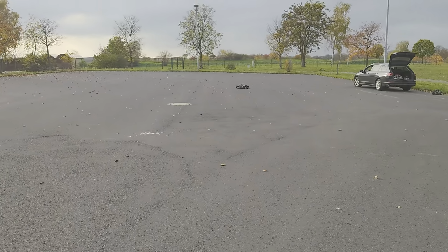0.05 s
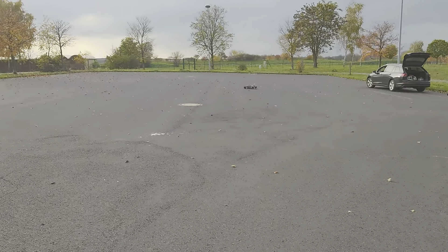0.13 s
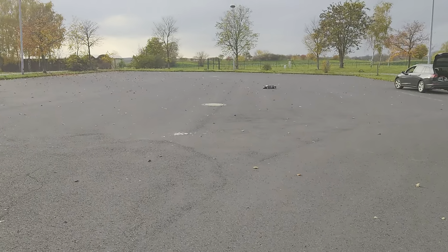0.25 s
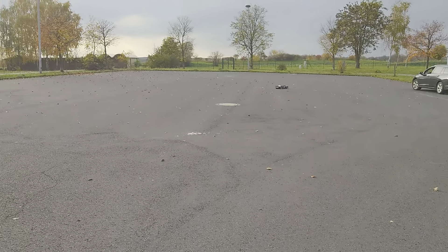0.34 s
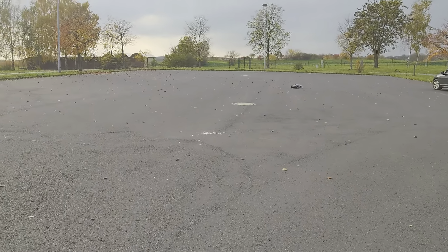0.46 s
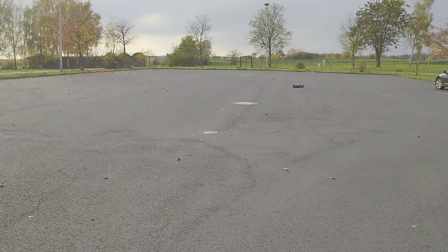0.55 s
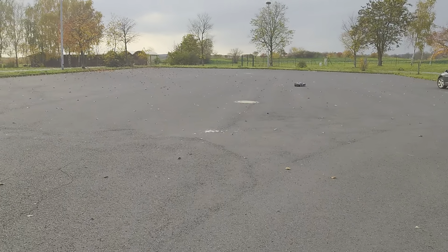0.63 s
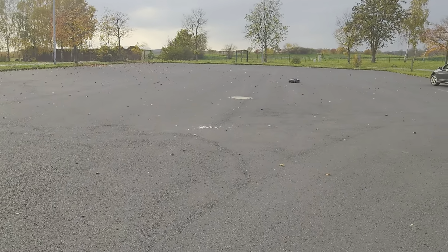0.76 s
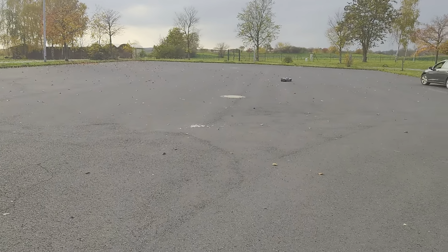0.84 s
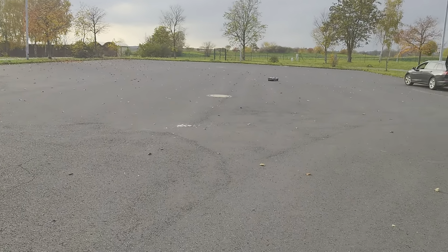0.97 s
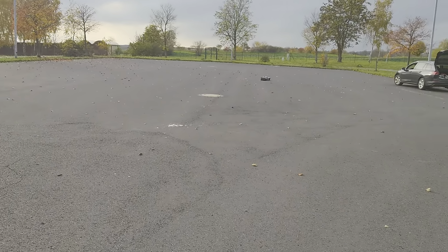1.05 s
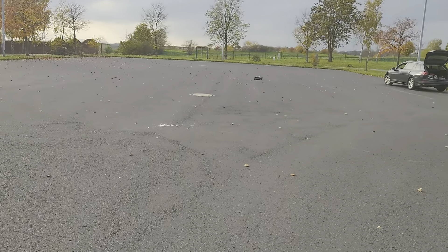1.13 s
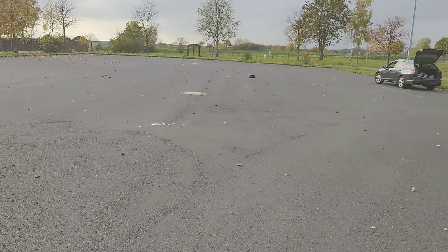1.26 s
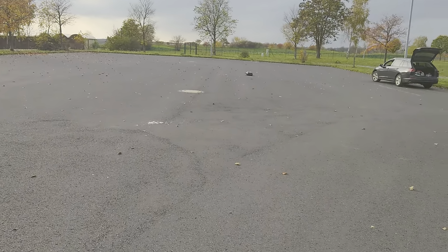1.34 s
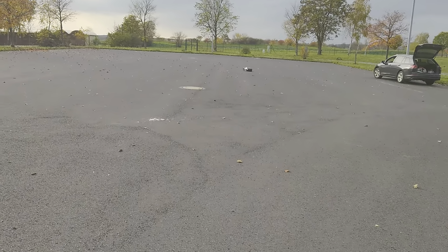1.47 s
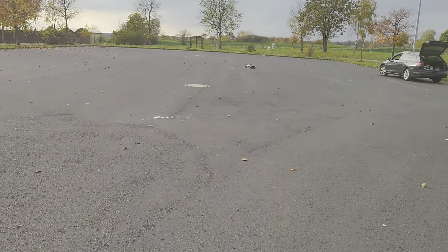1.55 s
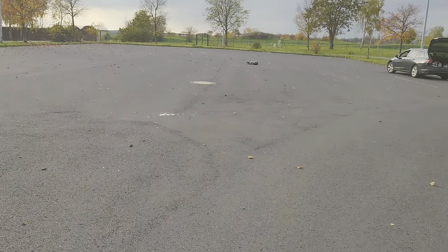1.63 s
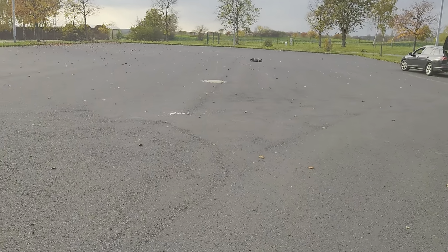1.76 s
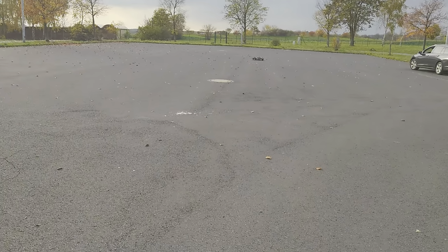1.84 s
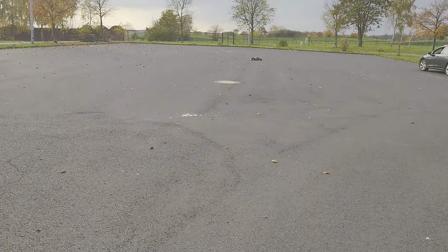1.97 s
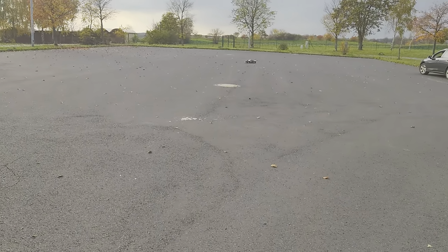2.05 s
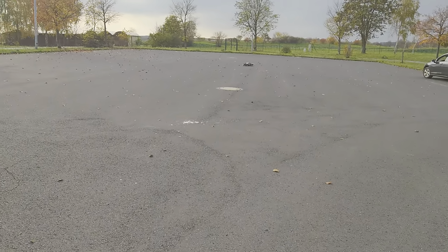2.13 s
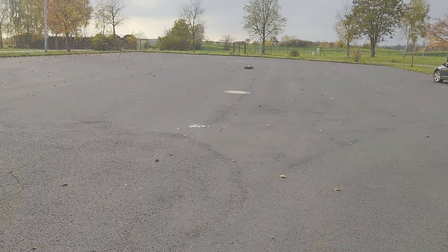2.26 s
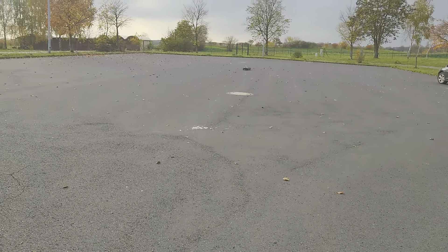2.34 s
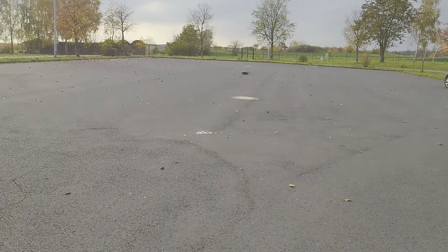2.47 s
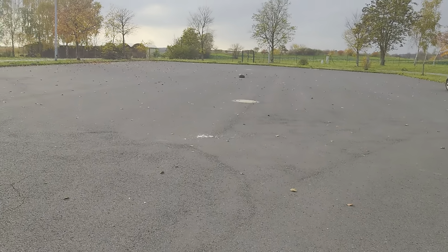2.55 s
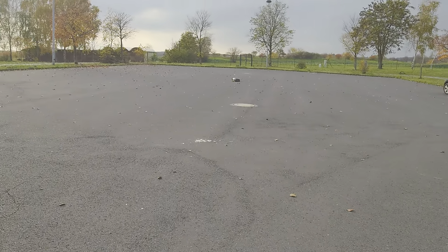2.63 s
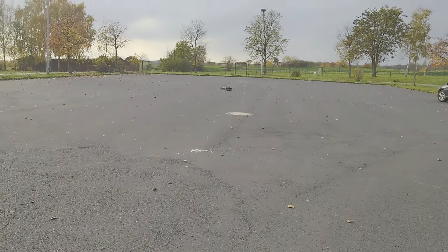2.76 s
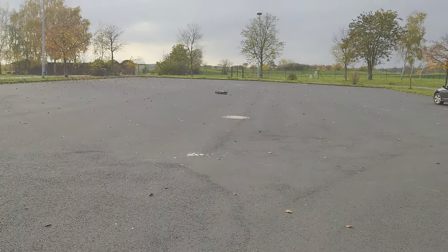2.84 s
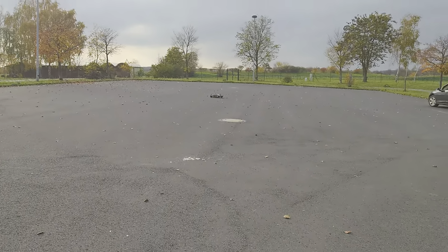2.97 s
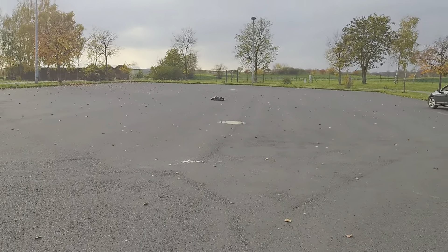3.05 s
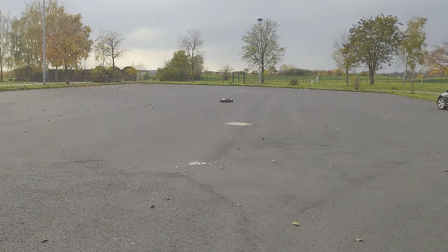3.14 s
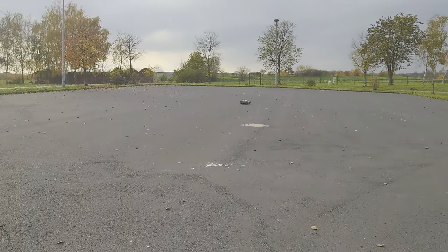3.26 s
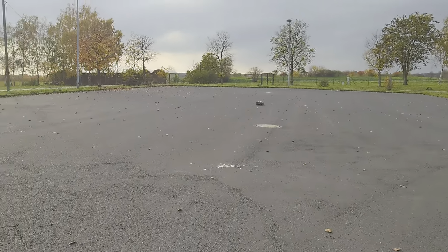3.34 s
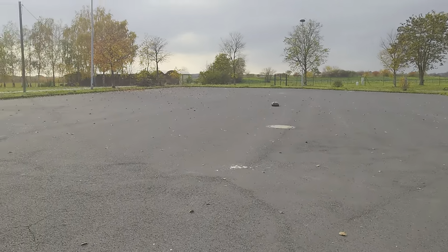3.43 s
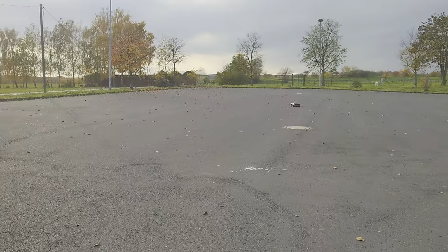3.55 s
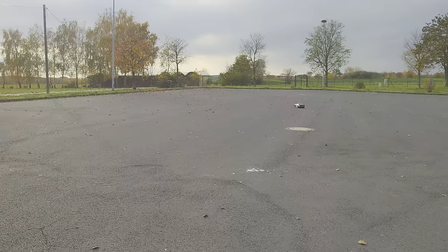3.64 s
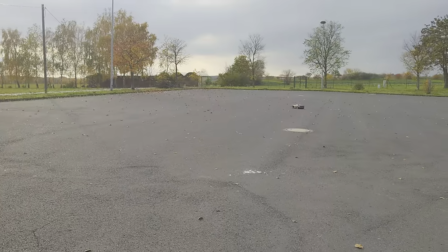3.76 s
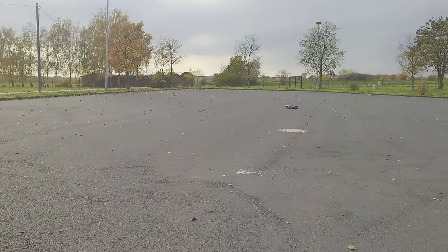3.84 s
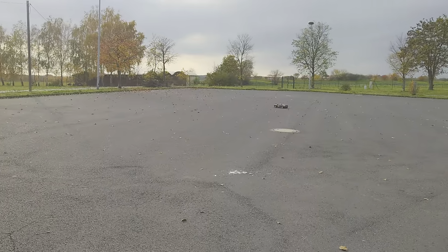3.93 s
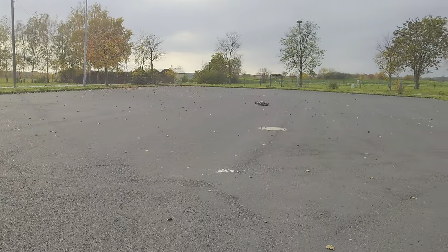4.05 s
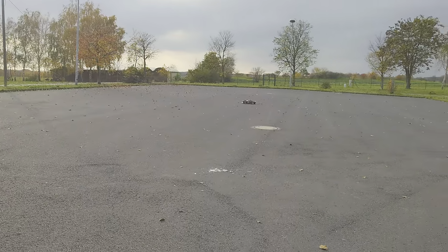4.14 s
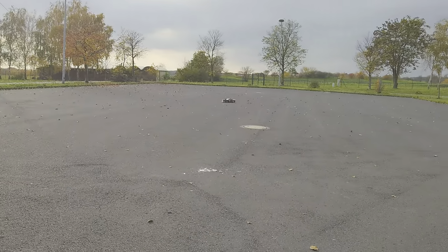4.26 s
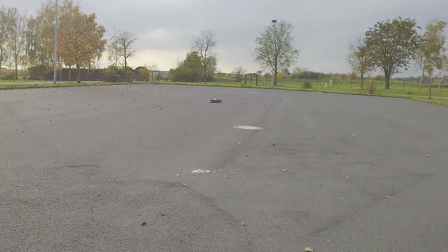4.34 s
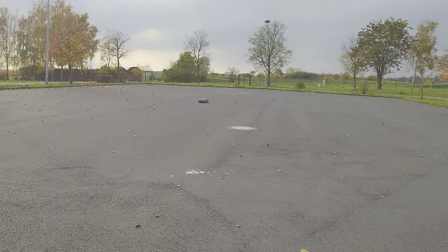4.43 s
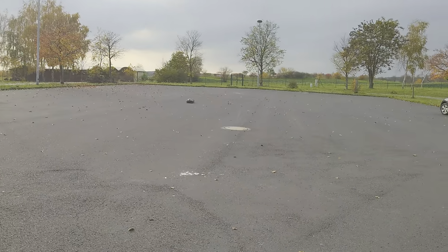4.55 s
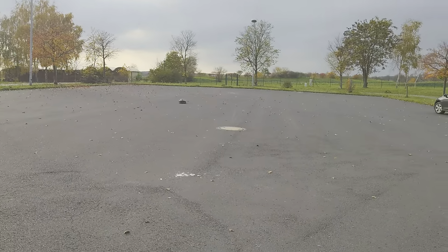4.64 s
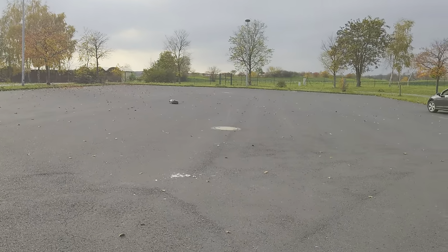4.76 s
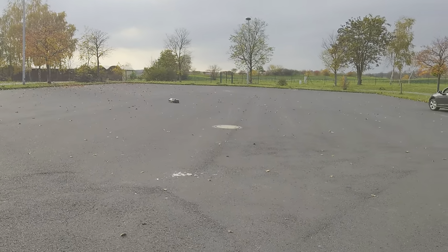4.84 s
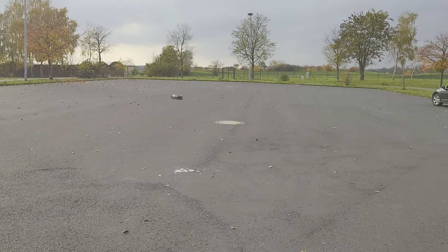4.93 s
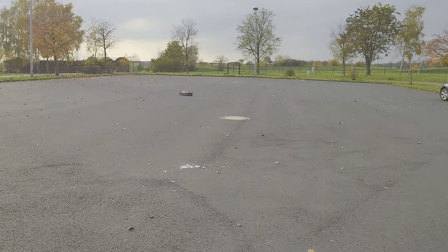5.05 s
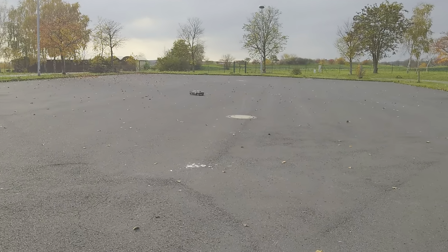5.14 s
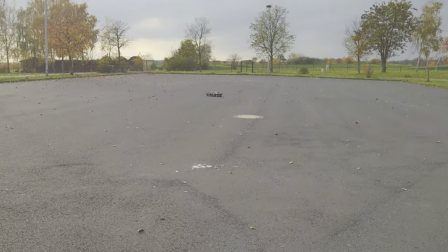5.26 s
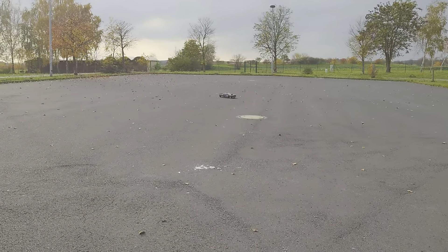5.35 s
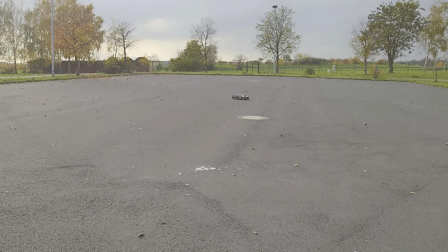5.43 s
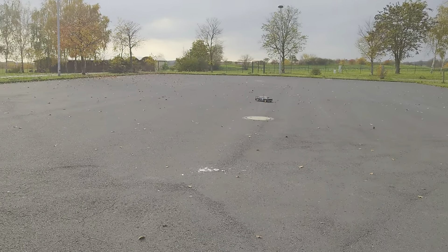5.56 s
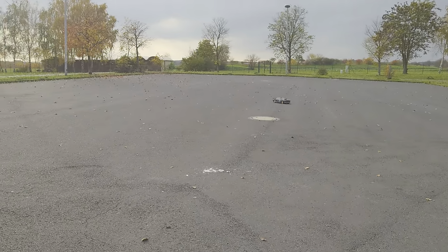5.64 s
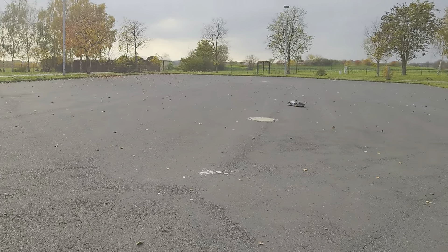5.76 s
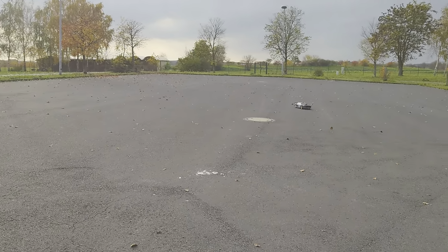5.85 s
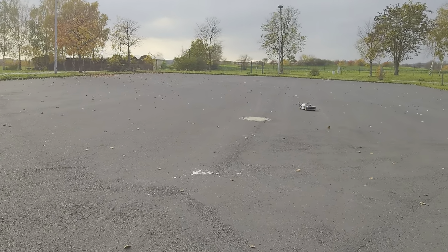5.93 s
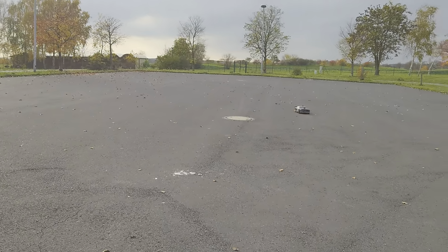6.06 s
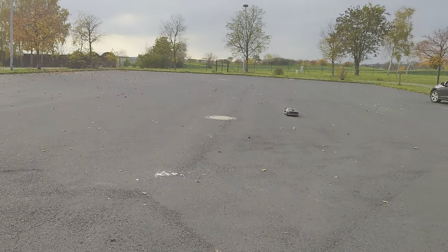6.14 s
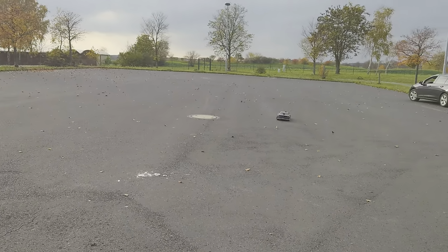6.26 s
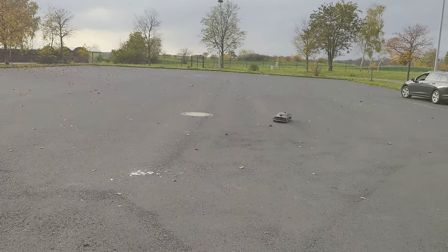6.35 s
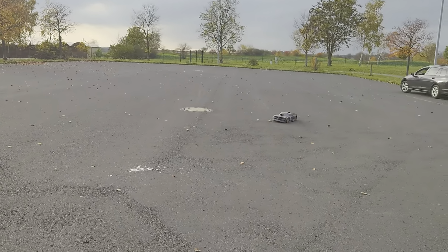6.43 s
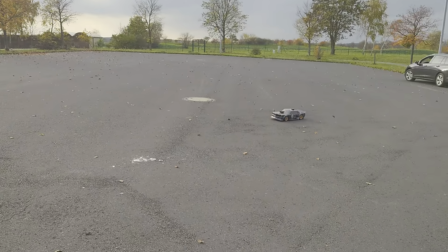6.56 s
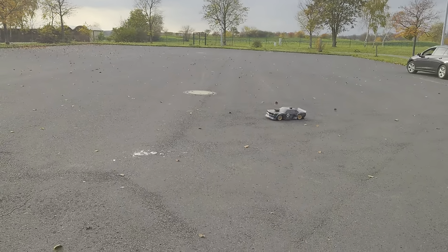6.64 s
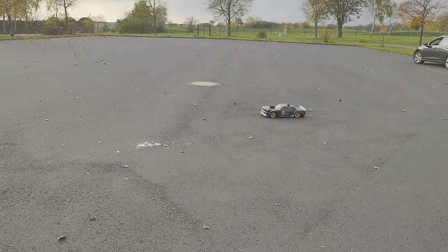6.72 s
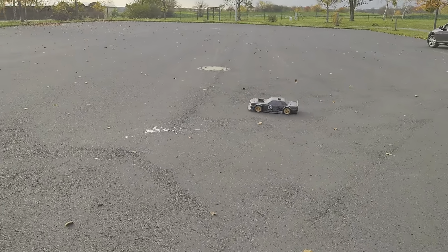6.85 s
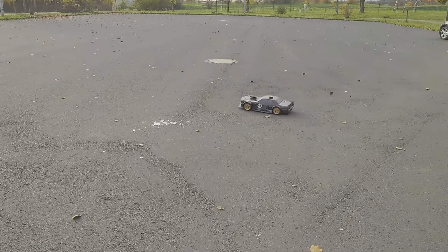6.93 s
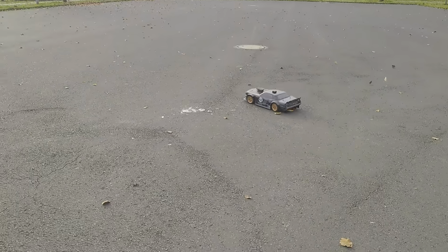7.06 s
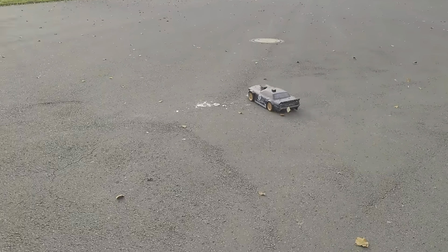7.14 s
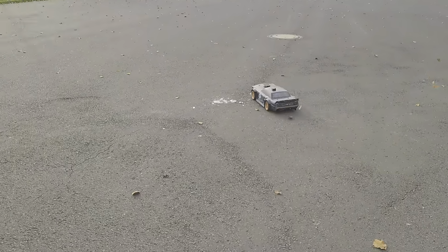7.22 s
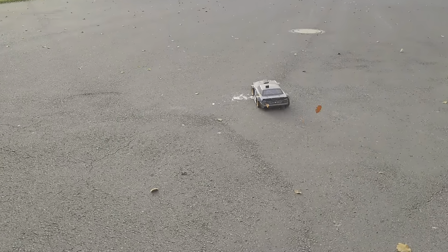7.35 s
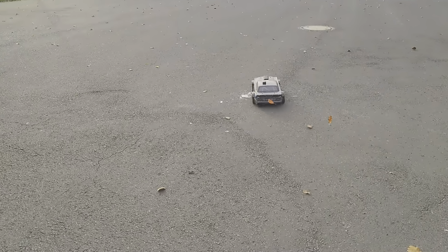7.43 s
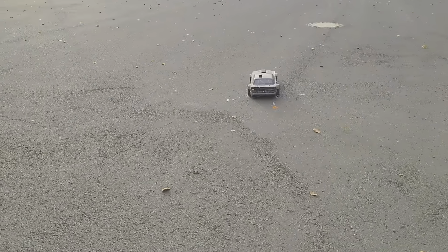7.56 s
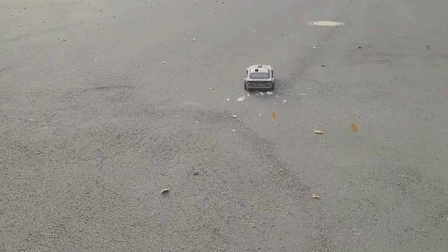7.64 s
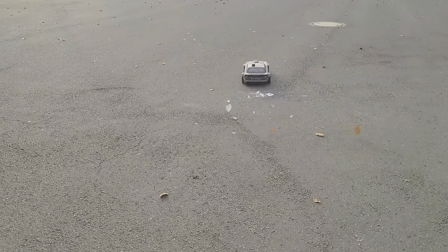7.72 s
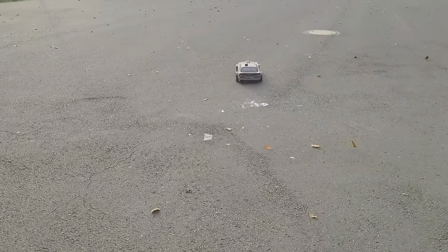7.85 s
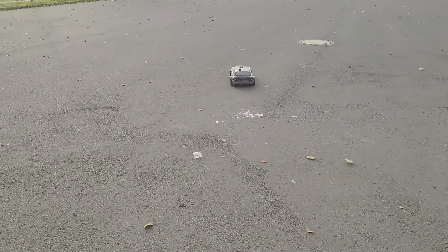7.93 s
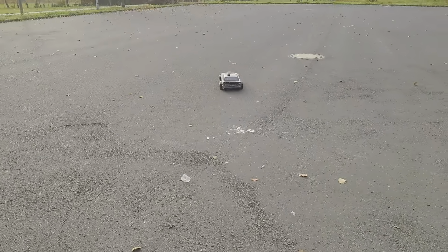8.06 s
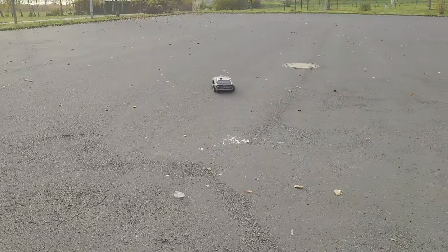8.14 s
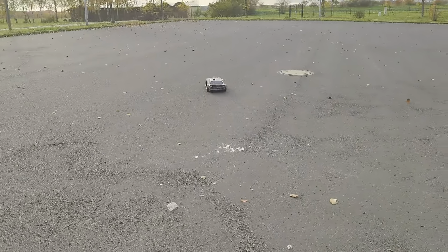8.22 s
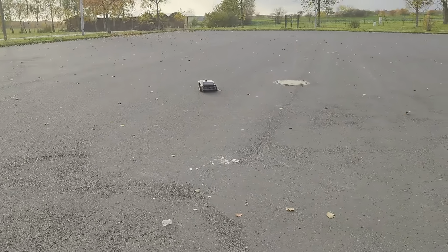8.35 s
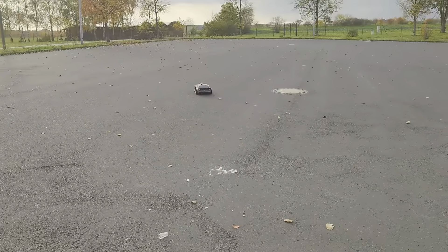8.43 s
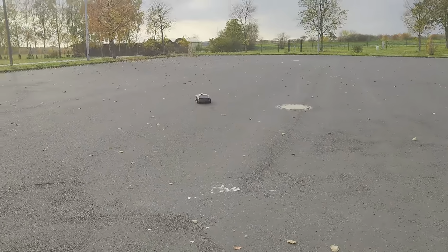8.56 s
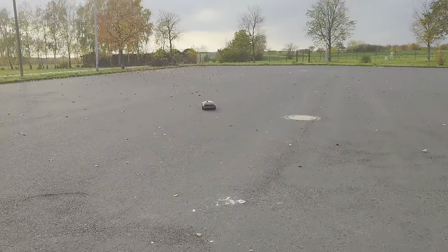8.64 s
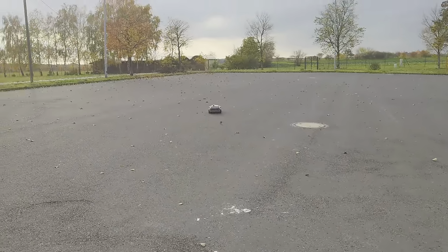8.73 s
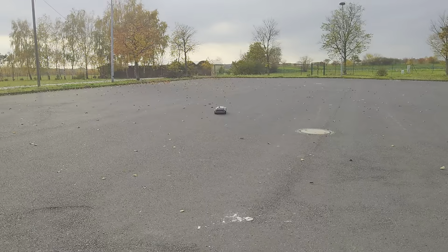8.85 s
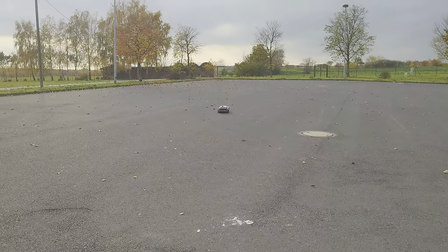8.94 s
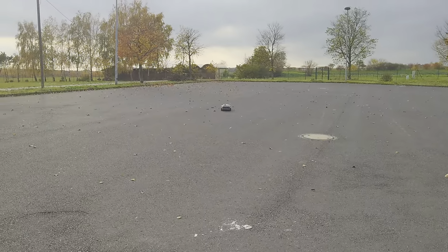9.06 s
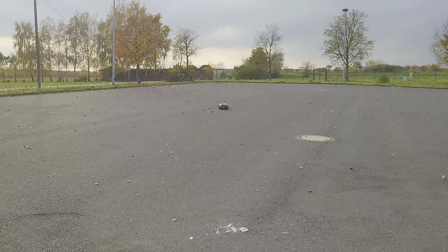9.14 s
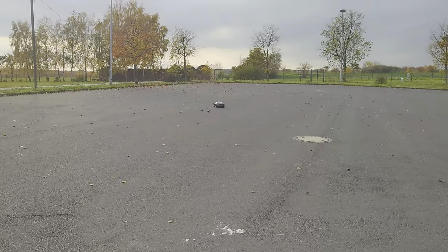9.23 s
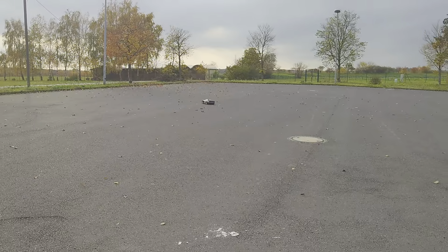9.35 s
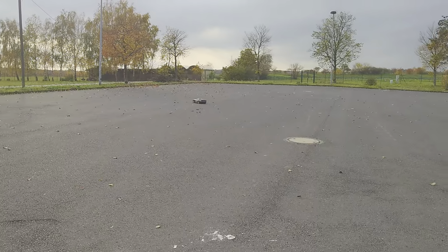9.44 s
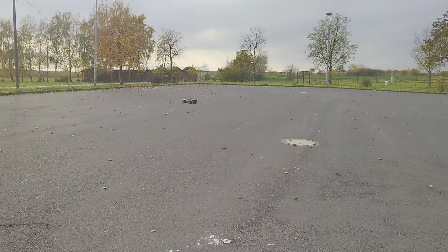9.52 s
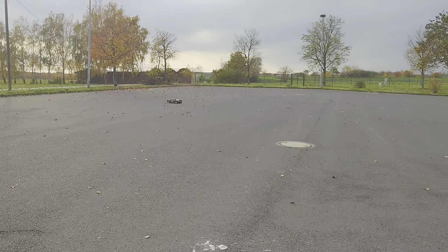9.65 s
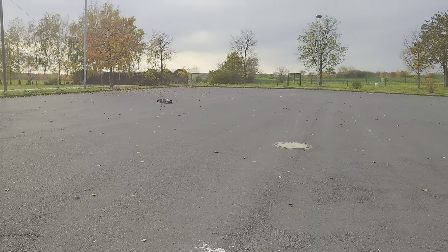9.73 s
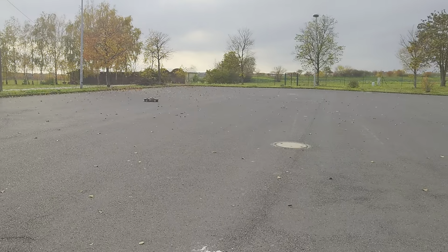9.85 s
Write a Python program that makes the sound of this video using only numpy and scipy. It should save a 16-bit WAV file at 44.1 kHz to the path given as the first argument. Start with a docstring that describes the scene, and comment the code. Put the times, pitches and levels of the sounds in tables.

```python
"""Small electric model car on open asphalt

It darts about, comes close, skids round and drives off. Gear teeth whine as shaken tones that climb with
each burst of throttle; filtered noise makes the drive train's rasp, the tyre roar and the fizz of grit.
Short noise hits are ticks and chassis knocks, sinking tones are brief low whirrs, and shaped noise is
the air, the breeze and soft bumps at the two microphones."""
import sys
import numpy as np
from scipy import signal
from scipy.fft import rfft, irfft
from scipy.io import wavfile
from scipy.ndimage import map_coordinates

SR = 44100
rng = np.random.default_rng(int(sys.argv[2]) if len(sys.argv) > 2 else 0)


def bounce(signal):
    """Save signal as a 16-bit WAV file at the path given by the first command-line argument."""
    frames = np.transpose(np.atleast_2d(signal))
    limited = np.clip(frames, -1, 1)
    pcm = np.round(limited * 32767).astype(np.int16)
    wavfile.write(sys.argv[1], SR, pcm)


N = 436149
TIME, BINS = np.arange(N) / SR, np.fft.rfftfreq(N, 1 / SR)
SIDES = np.array([[.5], [-.5]])  # shares a left-minus-right difference between the two channels


def amp(db):
    """Decibels to gain."""
    return 10 ** (np.asarray(db) / 20)


def evened(x):
    """Scales to rms 1."""
    return x / np.sqrt(np.mean(x ** 2) + 1e-20)


def filtered(x, gain):
    """Multiplies the spectrum by a gain along frequency."""
    return irfft(rfft(x) * gain, N)


def read(points, hz=BINS):
    """Reads a spectrum table on a log-frequency axis."""
    f, value = np.transpose(points)
    return np.interp(np.log(hz + 1), np.log(np.abs(f) + 1), value)


def curves(rows, t=TIME):
    """The columns of a table as functions of time."""
    s, *columns = np.transpose(rows)
    return [np.interp(t, s, c) for c in columns]


def add(mix, s, sound):
    """Mixes a sound in at a time in seconds."""
    part = mix[..., max(round(s * SR), 0):][..., :sound.shape[-1]]
    part += sound[..., :part.shape[-1]]


def wander(rate_hz):
    """Smooth random motion of rms 1, mostly slower than a rate."""
    return evened(filtered(rng.standard_normal(N), 1 / (1 + (BINS / rate_hz) ** 4)))


# Stereo likeness of the noises. Each row: frequency in Hz, left-right correlation from -1 to 1.
LIKENESS = [(40, -0.5), (130, 0.8), (600, 0.95), (2000, 0.94), (5000, 0.98), (9000, 0.67), (15000, 0.064)]


def pair(colour_db, drive=1):
    """Coloured noise at two microphones, alike in the midrange and unrelated at the very top."""
    a, b = rfft(rng.standard_normal((2, N)) * drive)
    same = np.clip(read(LIKENESS), -1, 1)
    other = same * a + np.sqrt(1 - same ** 2) * b
    x = irfft(np.array([a, other]) * amp(colour_db), N)
    return x / np.std(x.mean(0))


def scatter(x, t60, wet_db):
    """Adds a dying cloud of reflections, different at each microphone."""
    t = TIME[:SR // 2]
    taps = rng.standard_normal((2, len(t))) * amp(-60 * t / t60) * (t > .0005)
    taps /= np.linalg.norm(taps, axis=1, keepdims=True)
    wet = signal.fftconvolve(np.atleast_2d(x), taps, axes=1)[:, :N]
    return (x + amp(wet_db) * wet) / np.hypot(1, amp(wet_db))


def ripple(depth_db, width_hz):
    """Many small fixed resonances of the chassis, as a gain along frequency."""
    knots = rng.standard_normal(1000)
    return amp(depth_db * np.interp(BINS / width_hz, np.arange(len(knots)), knots))


def pressed(on, off, attack_s, release_s):
    """The load of one burst or slide, 0-1: it builds exponentially and lets go along a bell curve."""
    build = 1 - np.exp(-np.clip(TIME - on, 0, off - on) / attack_s)
    return build * np.exp(-(np.maximum(TIME - off, 0) / release_s) ** 2)


def blows(rows, low_hz, high_hz, t60, ring_db=-100):
    """Short hits: a dying burst of noise in a band, with a brief ring where the row gives one."""
    out, t = np.zeros((2, N)), TIME[:SR // 4]
    band = signal.butter(2, [low_hz, min(high_hz, SR / 2 - 1)], "bandpass", fs=SR, output="sos")
    for s, db, *ring in rows:
        noise = rng.standard_normal(len(t)) + .5 * rng.standard_normal((2, len(t)))
        hit = evened(signal.sosfilt(band, noise * amp(-60 * t / t60)))
        for hz in ring:
            tone = np.sin(2 * np.pi * hz * t) * amp(-60 * t / 0.02)
            hit = hit + amp(ring_db) * evened(tone)
        add(out, s, amp(db) * hit / abs(hit.mean(0)).max())
    return out


# Colour of the open air. Each row: frequency in Hz, density in dB per Hz.
AIR_COLOUR = [(20, 16), (68, 22.5), (198, -36), (319, 5), (459, 15), (897, 15.5), (1330, 11), (1610, -23),
              (3340, -26), (5080, -7), (10500, -60), (12800, -36)]
AIR_DB = -63


def open_air():
    """Steady air: noise shaped by a fixed spectrum."""
    return amp(AIR_DB) * pair(read(AIR_COLOUR))


def breeze():
    """A little wind at the microphones: low noise whose level wanders slowly."""
    colour = [(15, 0), (50, -2), (95, -4), (140, -14), (400, -40), (2000, -80)]  # Hz, dB
    gusts = evened(amp(3 * wander(6)))
    return amp(-68.5) * pair(read(colour)) * gusts


# Soft low bumps at the microphones. Each row: start in seconds, peak in dB before a 6.5 dB cut.
SOFT_BUMPS = [(2.467, -41), (3.548, -44), (4.951, -40), (5.932, -34), (6.901, -45)]


def bumps():
    """Soft thuds at the microphones: deep, quickly dying noise."""
    return amp(-6.5) * blows(SOFT_BUMPS, 20, 130, t60=0.18)


# Grit ticking on the car. Each row: start in seconds, peak in dB before filtering, ring in Hz.
GRIT_TICKS = [(0.1361, -33, 5300), (0.4495, -32, 5300), (0.483, -33, 2020), (0.5462, -33, 2300),
              (0.724, -36.5, 5130), (0.8506, -29, 2270), (0.8763, -32, 5200), (2.145, -31, 2600),
              (2.4914, -36, 2370), (5.9354, -24, 3740), (7.277, -17, 1430)]


def ticks():
    """Grit strikes the shell: bright clicks with a short ring, dulled around 9.5 kHz."""
    dip_db = -12 / (1 + ((BINS - 9500) / 2000) ** 4)
    return filtered(blows(GRIT_TICKS, 2200, 14000, t60=.022, ring_db=2), amp(dip_db))


# The chassis knocking over bumps. Each row: start in seconds, peak in dB at the car.
CHASSIS_KNOCKS = [(0.189, -24), (0.752, -41), (0.991, -36), (1.042, -32.5), (5.965, -19), (5.973, -13.5),
                  (6.011, -14), (7.012, -15), (7.21, -10)]


def knocks():
    """The chassis knocks: short midrange bursts of noise."""
    return blows(CHASSIS_KNOCKS, 700, 2300, t60=.035)


# Brief low whirrs. Each row: start in seconds, length in seconds, middle pitch in Hz, level in dB.
LOW_WHIRRS = [(0.194, 0.11, 1510, -45), (3.021, 0.15, 1460, -31), (4.352, 0.032, 1356, -34),
              (6.464, 0.1, 1390, -31)]


def whirrs(fall=0.085, rough=0.018, flutter_db=3.5):
    """Brief low whirrs: rough, sinking tones from tyres or the slowing motor."""
    out, pitch_shake = np.zeros(N), wander(126)
    flutter = evened(amp(flutter_db * wander(66)))
    for s, length, hz, db in LOW_WHIRRS:
        u = np.linspace(-.5, .5, int(length * SR))
        roughness = rough * pitch_shake[int(s * SR):][:len(u)]
        turns = np.cumsum(hz * (1 - fall * u + roughness)) / SR
        swell = signal.windows.tukey(len(u), .4)
        add(out, s, amp(db) * np.sqrt(2) * np.sin(2 * np.pi * turns) * swell)
    return out * flutter


# Tyres hopping in the skid. Each row: time in seconds, depth 0-1, mean hops per second.
SKID_HOPS = [(6.69, 0, 70), (6.72, .68, 70), (6.9, .5, 95), (6.98, .72, 92), (7.11, .85, 82), (7.16, 0, 80)]


def judder(uneven_db=0.8, scuff_db=0.5):
    """The load on the wheels: uneven asphalt, and in the skid scuffs and quick hops of unequal strength."""
    depth, rate = curves(SKID_HOPS)
    hops = np.cumsum(rate * (1 + .25 * wander(60.1))) / SR
    strikes = evened(np.exp(1.3 * np.cos(2 * np.pi * hops)) * amp(1.8 * wander(50)))
    depth = np.clip(depth, 0, 1)
    hopping = np.sqrt(1 - depth + depth * strikes ** 2)
    asphalt = evened(amp(uneven_db * wander(45)))
    return hopping * asphalt * amp(scuff_db * depth * wander(200))


# Bursts of throttle. Each row: on in seconds, off in seconds, whine in dB, coasting whine in dB (both before
# radiation), whine left minus right in dB, added roar in dB, added rasp in dB.
THROTTLE = [(0.854, 0.928, -53.5, -66, 0, 1, 7), (1.092, 1.325, -28, -46, 1, 9, 19),
            (1.58, 1.834, -27.5, -39.5, 4, 3.5, 9.5), (2, 2.102, -22, -66, 7, 0, 4),
            (2.364, 2.679, -30.5, -56, 1, 1, -0.5), (3.459, 3.766, -25.5, -41, 1, 4.5, 12.5),
            (3.899, 3.989, -23.5, -28, 0, 4, 5.5), (4.064, 4.26, -27.5, -50, 6, 9.5, 8),
            (4.413, 4.49, -34.5, -62, -5, 6.5, 5), (4.771, 4.917, -26, -63.5, 0.5, 5.5, 13.5),
            (5.078, 5.405, -25, -47, 3.5, 8.5, 11), (6.056, 6.469, -24, -40, -1, 2.5, 3),
            (7.186, 7.388, -16.5, -23.5, 1.5, 6.5, 14), (7.578, 7.812, -15.5, -43, -2, 8.5, 15),
            (8.088, 8.425, -21, -30.5, -2, 8, 13.5), (8.867, 9.217, -29.5, -40.5, -1, 1.5, 6.5)]
# Sideways slides. Each row: start in seconds, end in seconds, added roar in dB, added rasp in dB.
SIDE_SLIDES = [(2.721, 3.102, 5, 3), (6.702, 6.981, 7, 12), (6.985, 7.063, 0.5, 7.5)]
ATTACK_S, RELEASE_S = 0.012, 0.053  # of the load on the car
ROAR_AT_ONCE, RASP_AT_ONCE = 0.55, 0.65  # share of the added dB that comes at once; the rest builds up


def effort():
    """Decibels that bursts and slides add to the roar and to the rasp."""
    roar, rasp = np.zeros((2, N))
    for on, off, *_, roar_db, rasp_db in THROTTLE + SIDE_SLIDES:
        load = pressed(on, off, ATTACK_S, RELEASE_S)
        roar += roar_db * load * np.interp(TIME, [on, off], [ROAR_AT_ONCE, 1])
        rasp += rasp_db * load * np.interp(TIME, [on, off], [RASP_AT_ONCE, 1])
    return roar, rasp


# Motor speed through each run-up and run-down. Each row: time in seconds, mean gear tooth rate in Hz.
MOTOR_SPEED = [(.857, 4750), (.912, 4730), (.95, 3110), (1.02, 1315), (1.11, 1500), (1.14, 2150),
               (1.19, 4000), (1.25, 4900), (1.345, 5450), (1.39, 4100), (1.47, 1900), (1.545, 2200),
               (1.595, 3200), (1.655, 4500), (1.84, 6410), (1.87, 5700), (1.94, 3800), (1.975, 2900),
               (2.005, 2900), (2.09, 4200), (2.115, 4200), (2.19, 1700), (2.3, 1830), (2.355, 2550),
               (2.38, 3250), (2.42, 4150), (2.57, 5650), (2.68, 6930), (2.85, 4240), (3.2, 3506),
               (3.3, 1278), (3.43, 1700), (3.475, 3500), (3.505, 4300), (3.56, 4600), (3.755, 6800),
               (3.81, 4740), (3.87, 1350), (3.905, 3105), (3.95, 4350), (3.98, 4515), (4.035, 3360),
               (4.09, 4480), (4.17, 4980), (4.26, 6060), (4.3, 4300), (4.42, 2850), (4.48, 4000),
               (4.51, 3850), (4.56, 1950), (4.6, 1400), (4.68, 1400), (4.76, 2700), (4.81, 4200),
               (4.87, 5000), (4.925, 5300), (4.955, 4055), (5, 1996), (5.045, 2194), (5.07, 3850),
               (5.23, 5480), (5.39, 7450), (5.46, 4760), (5.7, 3670), (6.04, 3710), (6.14, 4450),
               (6.215, 5020), (6.33, 6200), (6.45, 7650), (6.7, 4094), (6.85, 3900), (7.15, 1400),
               (7.225, 1050), (7.255, 1800), (7.31, 3800), (7.34, 4450), (7.385, 5050), (7.415, 4000),
               (7.445, 2400), (7.49, 995), (7.535, 1000), (7.57, 2000), (7.595, 2500), (7.62, 3480),
               (7.71, 4800), (7.77, 5100), (7.825, 5600), (7.88, 3900), (7.93, 3200), (8.02, 2200),
               (8.065, 2300), (8.11, 3300), (8.15, 4200), (8.22, 4790), (8.28, 5170), (8.43, 6850),
               (8.5, 4120), (8.89, 4016), (9.05, 4990), (9.22, 6500), (9.26, 5570), (9.38, 5070),
               (9.88, 3275)]
STREAK_DB, STREAK_S = 3.2, .05  # depth and life of the streaks
STREAK_WIDTH, STREAK_FOLLOW = .075, .5  # width as share of their pitch; how far they follow the speed, 0-1


def streaks(x):
    """Shafts and belts feed the roar unevenly: narrow bands swell and fade, sliding with the motor's speed."""
    hz, t, z = signal.stft(x, SR, nperseg=768, noverlap=576)
    speed = curves(MOTOR_SPEED, t)[0].clip(1)
    slide = STREAK_FOLLOW * np.log(speed / speed.max())
    place = (np.log(hz[:, None] + 1) - slide) / STREAK_WIDTH
    moment = t / STREAK_S + 0 * place
    field = map_coordinates(rng.standard_normal((400, 400)), [place, moment], order=3, mode="wrap")
    gain = evened(amp(STREAK_DB * field.clip(-2, 2)))
    return signal.istft(z * gain, SR, nperseg=768, noverlap=576)[1][:, :N]


# Ringing of the plastic shell. Each row: frequency in Hz, width in Hz, strength in dB.
SHELL_MODES = [(1033, 67, -6.5), (1942, 25, 7.5), (2528, 72, 3), (4400, 84, -1), (4876, 46, 10)]


def shell_db():
    """The lift in dB that the shell's resonances give."""
    peaks = (amp(db) / (1 + (2 * (BINS - hz) / width) ** 2) for hz, width, db in SHELL_MODES)
    return 20 * np.log10(1 + sum(peaks))


# Drive train rasp. Each row: frequency in Hz, density in dB per Hz.
RASP_COLOUR = [(1590, -25), (2700, -2), (3040, -3.5), (4100, 4), (4560, 4), (6110, 2), (6870, 0.5),
               (7330, 0), (8010, -10.5), (9500, -8), (11000, -41.5), (14300, -44), (22000, -120)]
# Extra filter for the rasp from behind the car. Each row: frequency in Hz, gain in dB.
BEHIND_COLOUR = [(2700, 0.8), (3500, -4), (4400, -7), (5300, -3), (6900, 2), (9000, 1)]
# How far the tail faces the microphones. Each row: time in seconds, share 0-1.
TAIL_FACING = [(7.85, 0.042), (8.15, 1), (9.2, 0.9), (9.6, 0.076)]


def drive_train(load, ring):
    """Grainy noise through the shell, its fine resonances changing as the car turns."""
    grains = evened(amp(2 * wander(870))) * load
    # as the car turns, its two ends face the microphones in turn, each with its own fine resonances
    facing = np.pi / 2 * TIME / 1.3
    rattle = np.zeros((2, N))
    for share in (np.cos(facing), np.sin(facing)):
        end = filtered(pair(read(RASP_COLOUR) + .7 * ring, grains), ripple(3.2, 65))
        rattle += evened(end) * share
    behind = curves(TAIL_FACING)[0].clip(0, 1)
    rattle /= np.std(rattle.mean(0))
    return (1 - behind) * rattle + behind * filtered(rattle, amp(read(BEHIND_COLOUR)))


# Tyre roar of the distant car. Each row: frequency in Hz, density in dB per Hz.
FAR_COLOUR = [(260, -34), (450, -25), (539, -9), (640, -0.5), (761, 1), (889, -13.5), (965, -4.5),
              (1200, -3), (1430, 4.5), (1630, -3), (1820, 3), (1920, 0.5), (2380, -3.5), (2690, -14.5),
              (3200, -17), (4160, -16.5), (7040, -120)]
# Tyre roar of the near car. Each row: frequency in Hz, density in dB per Hz.
NEAR_COLOUR = [(260, -53), (450, -21.5), (640, -2.5), (749, -2.5), (919, -8), (1020, -1), (1130, -3.5),
               (1520, 4), (1690, -2), (1920, 0), (2090, 1.5), (2440, -4.5), (3000, -15), (3200, -13.5),
               (4160, -23), (7040, -120)]
# Chassis drumming. Each row: frequency in Hz, density in dB per Hz.
DRUM_COLOUR = [(65, -45), (130, -12), (190, -0.5), (231, 3.5), (262, 2.5), (310, 3.5), (442, -6.5),
               (520, -6), (680, 12), (1140, -120)]
# Level of the drumming. Each row: time in seconds, dB relative to the roar before its trim.
DRUM_LEVEL = [(0.3, -14.5), (1.25, -44), (3.05, -22.5), (3.7, -37), (4.25, -22.5), (4.8, -35.5),
              (5.75, -21), (6.85, -19), (7.75, -21.5), (8.6, -28), (9.6, -34)]
# Fizz of grit. Each row: frequency in Hz, density in dB per Hz.
FIZZ_COLOUR = [(6180, -9.5), (10500, -7.5), (11100, -9), (12200, 6), (12800, 7), (14400, -1.5), (15300, -1),
               (16000, -61.5)]
# Nearness of the car. Each row: time in seconds, nearness 0-1.
NEARNESS = [(5.8, 0), (6.7, 0.88), (9.1, 1), (9.9, 0)]
NEAR_FIZZ_DB = 2.5  # less treble is lost on the way when the car is near


def rolling(tyre, rasp, fizz, load, tyre_db=-1.5, rasp_db=4.0, drum_db=0, fizz_db=-5.5, grit_db=4):
    """Tyres and drive train shake the shell; the roar changes colour as the car comes close."""
    drum, = curves(DRUM_LEVEL)
    ring = shell_db()
    close = curves(NEARNESS)[0].clip(0, 1)
    far_roar = pair(read(FAR_COLOUR) + .5 * ring, load)
    near_roar = pair(read(NEAR_COLOUR) + ring, load)
    roar = np.sqrt(1 - close) * far_roar + np.sqrt(close) * near_roar
    small_db = -10 * np.log10(1 + (165 / (BINS + 1)) ** 8)  # so small a chassis radiates no deep bass
    grit = evened(amp(grit_db * wander(9600).clip(-3, 3))) * load
    out = amp(tyre + tyre_db) * streaks(roar)
    out += amp(tyre + drum + drum_db) * pair(read(DRUM_COLOUR) + small_db, load)
    out += amp(rasp + rasp_db) * drive_train(load, ring)
    return out + amp(fizz + fizz_db + NEAR_FIZZ_DB * close) * pair(read(FIZZ_COLOUR), grit)


# Panels and gear case ringing while speed or a skid shakes them. Each row: on in seconds, off in seconds,
# frequency in Hz, width in Hz, level in dB.
PANEL_RINGS = [(1.794, 1.847, 4970, 263, -31), (3.623, 3.748, 4420, 260, -34),
               (5.28, 5.37, 5110, 129.6, -30), (5.6, 6.004, 1840, 99, -37.5),
               (6.282, 6.468, 5250, 111, -25), (6.317, 6.477, 4600, 197, -27.5),
               (6.713, 7.1, 1552, 170, -32), (6.95, 7.102, 2270, 257.7, -22.5),
               (6.93, 7.089, 4500, 491, -24), (8.46, 9.24, 1914, 71, -34.5), (9.25, 9.577, 1850, 90.7, -45)]
WHINE_ATTACK_S, WHINE_RELEASE_S = 0.012, 0.014  # the release also ends the panel rings


def ringing(load, apart=0.9):
    """Shaken by the load on the wheels, one resonance after another stands out of the roar."""
    out = np.zeros((2, N))
    shake = (rng.standard_normal(N) + apart * rng.standard_normal((2, N))) * load
    for on, off, hz, width, db in PANEL_RINGS:
        at = slice(int(on * SR), int((off + 0.16) * SR))
        ring = signal.lfilter(*signal.iirpeak(hz, hz / width, SR), shake[:, at])
        out[:, at] += amp(db) * evened(ring) * pressed(on, off, ATTACK_S, WHINE_RELEASE_S)[at]
    return out


# The motor growling at low speed before it picks up. Each row: on in seconds, off in seconds,
# level in dB before the growl lift.
MOTOR_GROWLS = [(1.043, 1.15, -38), (1.482, 1.56, -35), (2.3, 2.36, -33), (3.379, 3.455, -34),
                (4.551, 4.745, -33.5), (5.007, 5.058, -41), (7.212, 7.262, -26), (7.52, 7.572, -19.5),
                (8.02, 8.095, -27.5)]
# Harmonics of the growl. Each row: multiple of the tooth rate, level in dB.
GROWL_HARMONICS = [(1, -2), (2, -18), (3, -19)]


def growling(hz, mesh, lift_db=2.0):
    """Low harmonics of the tooth rate, blooming as they pass the shell's main resonance."""
    growl = np.zeros(N)
    for on, off, db in MOTOR_GROWLS:
        growl += amp(db + lift_db) * pressed(on, off, WHINE_ATTACK_S, WHINE_RELEASE_S)
    buzz = sum(amp(db) * np.cos(round(k) * mesh) for k, db in GROWL_HARMONICS)
    bloom = .5 + 1 / (1 + ((hz - 1950) / 170) ** 2)
    return growl * buzz * bloom


# How well the car radiates the whine. Each row: tooth rate in Hz, gain in dB.
WHINE_RADIATION = [(1900, -7.5), (2700, -29), (3300, -17), (4000, -8), (4550, -1), (4820, 0), (5020, 3.5),
                   (5300, -4.5), (6200, -3.5), (7500, -7.5)]
COAST_FADE_S = 1.6
COAST_SING = .65  # the second gear stage never sings below this share of its full-throttle strength
SKIP_HZ = 5500  # around and above this tooth rate the teeth skip, and the whine grows rough
WHEEL_TUG, TEETH_PER_TURN = .013, 115  # each wheel turn tugs at the speed: share of speed, teeth per turn
JITTER, WARBLE, COGGING = .009, .009, .036  # fast and slow speed error, jerks of the slow motor: shares of speed
FLUTTER_DB, SIDEBAND_DB, SPUR_DB = 3.0, -12, -2


def whine(roar_db, rasp_db, wobble=0.26, order=17):
    """Gear teeth mesh at a pitch that shakes with the road; the pinion sways once a turn."""
    hz = curves(MOTOR_SPEED)[0].clip(1)
    tug = WHEEL_TUG * np.sin(2 * np.pi * np.cumsum(hz) / SR / TEETH_PER_TURN)
    speed_error = JITTER * wander(266) + WARBLE * wander(63) + tug
    flutter = FLUTTER_DB * wander(70)
    # loose teeth strike unevenly, which wraps the tone in a rough halo
    backlash = .27 * wander(700)
    sides = np.array([evened(amp(flutter + 1.6 * wander(25))) for side in range(2)])
    # the gears chatter under throttle and run truer when coasting
    strain = np.clip(1.5 + (rasp_db - roar_db) / 20, .25, 1.15)
    cogging = COGGING * wander(200) / (1 + (hz / 2700) ** 8)
    skipping = .016 * wander(600) / (1 + (SKIP_HZ / hz) ** 20)
    mesh = 2 * np.pi * np.cumsum(hz * (1 + strain * speed_error + cogging + skipping)) / SR
    # uneven teeth put side tones at multiples of the shaft rate
    uneven = sum(amp(SIDEBAND_DB) * wander(32) * np.cos(k * mesh / order) for k in range(2, 5))
    sway = 1 + strain * (wobble * np.cos(mesh / order) + backlash + uneven)
    level, throttle = np.zeros((2, N)), np.zeros(N)
    radiation = amp(read(WHINE_RADIATION, hz))
    next_starts = [row[0] for row in THROTTLE[1:]] + [N / SR]
    for (on, off, db, coast_db, pan_db, *_), until in zip(THROTTLE, next_starts):
        driven = pressed(on, off, WHINE_ATTACK_S, WHINE_RELEASE_S)
        fade = np.exp(-np.maximum(TIME - off, 0) / COAST_FADE_S)
        coasting = pressed(off, until, WHINE_ATTACK_S, WHINE_RELEASE_S) * fade
        level += (amp(db) * driven + amp(coast_db) * coasting) * radiation * amp(pan_db * SIDES)
        throttle += driven
    # a second gear stage, an octave lower, sings as it crosses the shell's resonance near 1.7 kHz
    resonance = 1 / np.sqrt(1 + ((hz / 2 - 1700) / 480) ** 6)
    spur = np.maximum(throttle, COAST_SING) * amp(roar_db + SPUR_DB) * np.cos(mesh / 2) * resonance
    tone = level * np.cos(mesh) * sway + growling(hz, mesh) * (1 + .5 * (sway - 1))
    # the small gear case radiates no bass
    out = filtered(tone, ripple(2.2, 140) / (1 + (700 / (BINS + 1)) ** 6))
    return scatter(out * sides + spur * sides[0], t60=.035, wet_db=-6)


# Colour difference of the ports. Each row: frequency in Hz, left minus right in dB before the overall pan.
PORT_TILT = [(200, 3), (600, 3.5), (1300, 2.5), (2500, 0.5), (4500, 9), (8000, -3), (12500, 1)]
# Phase difference of the ports. Each row: frequency in Hz, lead of the left microphone in radians.
PORT_LEAD = [(400, -0.027), (1000, -0.35), (2200, -0.85), (4500, -1.58), (12000, -1.5)]
PAN_DB = -6  # overall left minus right


def microphones(x):
    """The two ports differ in colour, phase and level."""
    ports = amp(SIDES * read(PORT_TILT)) * np.exp(1j * SIDES * read(PORT_LEAD))
    ports /= np.sqrt(abs(ports.mean(0)) + 1e-6)
    return filtered(x, ports) * amp(SIDES * PAN_DB)


# The car rolling with no throttle. Each row: time in seconds, tyre roar in dB, drive train rasp in dB,
# both before the trims of the rolling layers.
ROLL_LEVEL = [(0, -33.5, -41.5), (0.15, -41, -57.5), (0.49, -42.5, -59.5), (0.65, -56.5, -72.5),
              (0.985, -61, -77.5), (1.005, -36, -54), (1.032, -49, -68), (1.06, -39.5, -61),
              (1.45, -42.5, -55), (1.95, -34, -45), (2.2, -40, -56), (2.7, -36.5, -39.5),
              (3.1, -33.5, -41.5), (3.33, -34.5, -60.5), (3.87, -38, -49.5), (4.48, -42, -51),
              (4.62, -41, -59), (5.0, -41, -50), (5.55, -35.5, -46.5), (6.2, -36, -37.5),
              (6.55, -27.5, -35.5), (7.16, -28, -42), (7.48, -26, -39), (7.95, -30, -41.5),
              (8.75, -28, -38.5), (9.44, -29.5, -45), (9.8, -35, -48)]
FIZZ_FOLLOW = 0.83  # share of the added rasp dB that the fizz of grit follows


def scene():
    """The car, placed between the microphones, with a faint open-air echo, the air and the breeze."""
    (roar, rasp), (more_roar, more_rasp) = curves(ROLL_LEVEL), effort()
    load = judder()
    fizz = rasp + FIZZ_FOLLOW * more_rasp
    car = ticks() + knocks() + whirrs()
    car += rolling(roar + more_roar, rasp + more_rasp, fizz, load)
    car += ringing(load)
    car += whine(roar + more_roar, rasp + more_rasp)
    car = scatter(microphones(car), t60=.25, wet_db=-20)
    return open_air() + breeze() + bumps() + car


EDGE_HZ = 16100


def record(dry):
    """Rounds off the highest peaks, then cuts the treble steeply above the band edge."""
    dry = dry / (1 + (dry / .9) ** 8) ** (1 / 8)
    low_pass = signal.firwin(511, EDGE_HZ, window=("kaiser", 9), fs=SR)
    return signal.oaconvolve(dry, low_pass[None], "same")


dry = scene()
out = record(dry)
bounce(out)
```